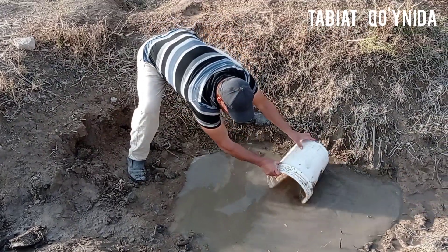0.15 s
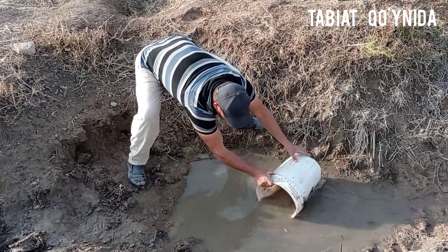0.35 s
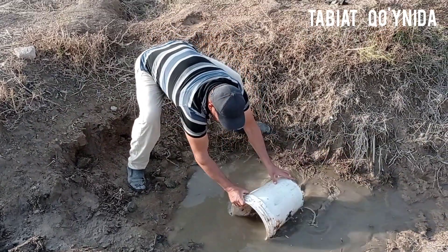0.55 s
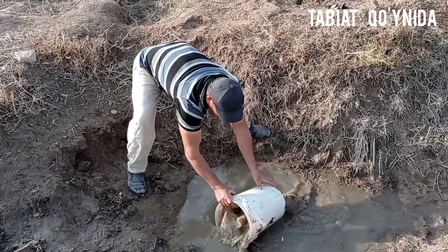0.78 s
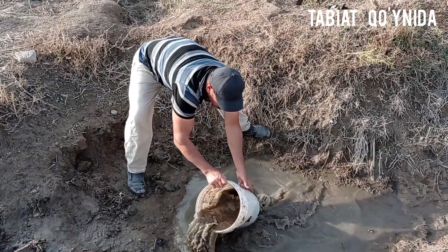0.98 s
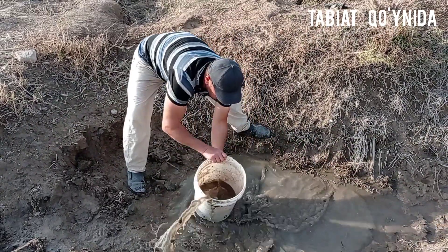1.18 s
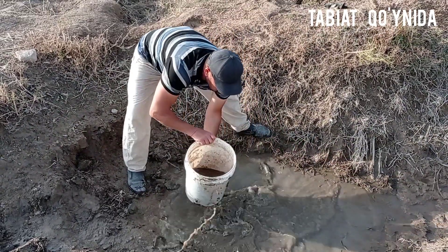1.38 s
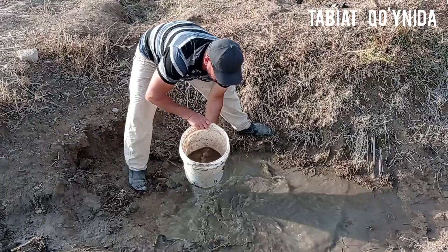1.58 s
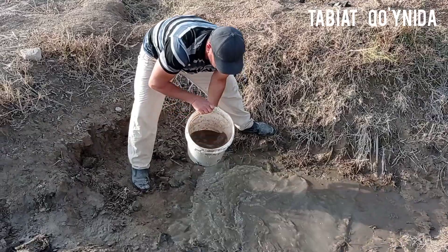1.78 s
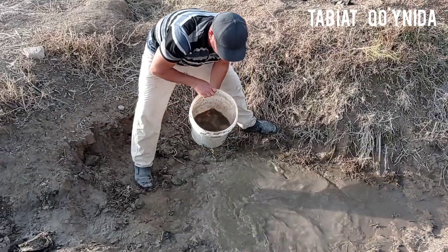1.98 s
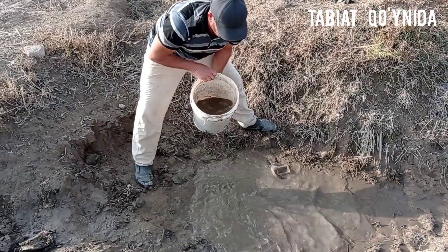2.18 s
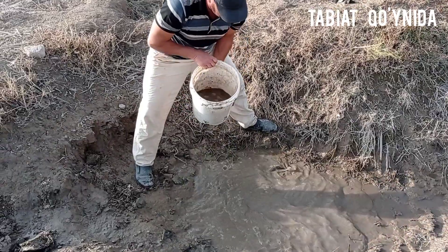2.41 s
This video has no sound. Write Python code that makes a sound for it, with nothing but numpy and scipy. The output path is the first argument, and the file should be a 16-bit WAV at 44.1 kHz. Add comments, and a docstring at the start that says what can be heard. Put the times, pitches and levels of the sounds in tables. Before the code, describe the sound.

Water sloshes and splashes as a plastic bucket scoops through a shallow puddle, with bubbly gulps and bright spatter, then thins to trickles and drops; close outdoor microphone with light wind thuds and faint hiss.

```python
"""Outdoors: light wind thuds on the microphone over a faint hiss and one thin steady tone.
A plastic bucket is dragged through a shallow muddy puddle, tipped up and lifted out.
Stirring drives swarms of damped-sine bubbles and spray; big air pockets gulp as rising sines.
Single bubbles ring amid droplets, and noise bursts snap in the treble.
The water calms to sparse trickles and the last drops fall back."""
import sys
import numpy as np
from scipy import signal
from scipy.fft import rfft, irfft, next_fast_len
from scipy.io import wavfile
from scipy.ndimage import uniform_filter1d, map_coordinates

SR = 44100
rng = np.random.default_rng(int(sys.argv[2]) if len(sys.argv) > 2 else 0)


def generate_wav(signal):
    """Clip the signal to [-1, 1] and save it as 16-bit WAV at the path in sys.argv[1]."""
    frames = np.transpose(np.atleast_2d(signal))
    scaled = np.clip(frames, -1, 1) * 32767
    pcm = np.round(scaled).astype(np.int16)
    wavfile.write(sys.argv[1], SR, pcm)


N = 108045  # samples
TOP_HZ = 15720  # band limit


def amp(db):
    """Decibels to gain."""
    return 10 ** (np.asarray(db) / 20)


def unit(x):
    """Scaled to rms 1."""
    return x / np.sqrt(np.mean(x ** 2) + 1e-20)


def along(points, hz):
    """Level in dB at hz from (Hz, dB) points on a log axis; -120 dB outside."""
    point_hz, point_db = np.transpose(points)
    return np.interp(np.log(hz + 1), np.log(point_hz + 1), point_db, -120, -120)


def curves(rows):
    """One value per sample for each column after the time."""
    time_s, *columns = np.transpose(rows)
    return [np.interp(np.arange(N) / SR, time_s, column) for column in columns]


def wobble(rate_hz):
    """Smooth random curve through rate_hz knots a second."""
    knots = rng.standard_normal(1000)
    return map_coordinates(knots, [np.arange(N) * rate_hz / SR])


def filtered(x, response):
    """x times a response of frequency, zero-padded against wrap-around."""
    size = next_fast_len(N + 8192)
    gain = response(np.fft.rfftfreq(size, 1 / SR))
    return irfft(rfft(x, size) * gain, size)[:N]


def noise(spectrum):
    """Gaussian noise coloured by a spectrum, rms 1."""
    white = rng.standard_normal(N)
    return unit(filtered(white, lambda hz: amp(along(spectrum, hz))))


def bubbles(start_s, gain, hz, cycles, rise, size):
    """Ringing air bubbles: sines losing 40 dB per life of cycles, soft onset, rising pitch, size samples."""
    step = np.arange(size)
    turns = step / SR * np.minimum(hz, TOP_HZ)[:, None]
    life = turns / np.clip(cycles, .5, 150)[:, None]
    envelope = gain[:, None] * amp(-40 * life) * (1 - np.exp(-turns / 1.812))
    wave = envelope * np.sin(2 * np.pi * turns * (1 + rise * np.minimum(life, 1) / 2))
    wave = wave * np.minimum(1, 4 - 4 * step / size)  # fade over the last quarter
    at = np.round(start_s * SR).astype(int)[:, None] + step
    return np.bincount(at.ravel(), wave.ravel(), N + size + SR)[:N]


def swarm(spectrum, count, size, base_cycles, spread_db, noise_db, lumps_db, lump_rate_hz):
    """Random bubbles, coloured by spectrum, over a noise bed; level swings in random lumps; rms 1."""
    when, pitch, loudness, damping = rng.random((count, 4)).T
    low_hz, high_hz = spectrum[0][0], spectrum[-1][0]
    hz = low_hz * (high_hz / low_hz) ** pitch
    gain = hz * amp(along(spectrum, hz) + spread_db * loudness ** 3)
    cycles = base_cycles * (0.19 + 1.55 * damping)
    grains = bubbles(when * N / SR, gain, hz, cycles, rise=0.025, size=size)
    bed = amp(noise_db) * noise(spectrum)
    lumps = amp(lumps_db * np.tanh(wobble(lump_rate_hz)))
    return unit((unit(grains) + bed) * lumps)


# wind level: (time [s], level [dB])
WIND = [(0, -76.5), (.04, -65), (.08, -85), (.13, -58.5), (.17, -70), (.23, -53), (.31, -64), (.36, -61),
        (.47, -65.5), (.53, -76.5), (.61, -67), (.81, -71), (.91, -66), (.99, -69.5), (1.07, -59),
        (1.25, -69.5), (1.39, -56.5), (1.5, -79), (1.63, -65), (1.81, -80), (1.86, -56.5), (1.97, -80),
        (2.025, -66.5), (2.08, -75), (2.13, -55.5), (2.2, -83), (2.3, -75), (2.335, -57), (2.355, -52),
        (2.39, -56.5), (2.45, -65.5)]
# wind colour: (frequency [Hz], relative density [dB per Hz])
RUMBLE = [(25, -32), (44, -0.5), (81, 9), (141, 0.5), (177, -11.5), (230, -9.5), (300, -61.5)]


def wind():
    """Wind thuds: low noise on a smoothed level curve with a small random wobble."""
    level_db, = curves(WIND)
    level_db = uniform_filter1d(level_db, size=500) + 1.0 * wobble(25.725)
    return amp(level_db) * noise(RUMBLE)


# hiss colour: (frequency [Hz], relative density [dB per Hz])
HISS = [(150, -14), (450, -22), (700, -17.5), (7400, -25.5), (15500, -35.5)]
HISS_DB = -87  # rms


def hiss():
    """Steady coloured noise."""
    return amp(HISS_DB) * noise(HISS)


# steady sine: (frequency [Hz], level before a 3.5 dB lift [dB])
TONE = [(7822, -94.5)]


def tone():
    """Constant sine, peak 3.5 dB above the table level."""
    t = np.arange(N) / SR
    return sum(amp(db + 3.5) * np.sin(2 * np.pi * hz * t) for hz, db in TONE)


# stirred water: (time [s], level [dB], spray re level [dB], gurgle re level [dB])
STIR = [(0, -63, -10.5, -24.5), (.045, -74, -7, -13), (.065, -78.5, -23.5, -23.5), (.108, -82, -2.5, -11),
        (.116, -73, -11.5, -7.5), (.19, -78, -16, -13), (.23, -58, -23, -20), (.275, -58, -25.5, 4.5),
        (.305, -66, -5.5, -21.5), (.314, -56.5, -3.5, -3.5), (.39, -50.5, -6.5, -14),
        (.43, -54, -13.5, -10.5), (.48, -59.5, -11, -24), (.54, -51.5, -4, -17), (.57, -49, -1.5, -5),
        (.65, -46.5, -9.5, -13), (.72, -50.5, -0.5, -1), (.77, -49.5, -10.5, -13.5),
        (.84, -50, -2.5, -12.5), (.89, -44, -11, -4.5), (.95, -48.5, -1.5, -6), (1.06, -48.5, -4.5, -8.5),
        (1.12, -44, -4, -15), (1.25, -51.5, 2.5, -3), (1.4, -50.5, -1, -6), (1.53, -58.5, 6, -9.5),
        (1.58, -58, -4.5, -46), (1.65, -64.5, 4.5, -16.5), (1.7, -55.5, -12, -23.5), (1.735, -60, 4, -17.5),
        (1.78, -63.5, -5.5, -13.5), (1.87, -67, -0.5, -19.5), (2.04, -77, -2, -8),
        (2.065, -72.5, 3.5, -8.5), (2.16, -77.5, -3, -11), (2.22, -85.5, 7, -0.5), (2.45, -93.5, -0.5, 5)]
# mid-size bubbles: (frequency [Hz], relative density [dB per Hz])
BODY = [(350, -21), (600, -7), (729, -10), (1070, -1.5), (1350, -1), (1790, 1), (3600, -8.5), (4680, -30)]
# smallest bubbles: (frequency [Hz], relative density [dB per Hz])
SPRAY = [(1760, -4.5), (3000, -1), (4500, -3.5), (5060, -6.5), (6310, -9.5), (8080, -19.5), (9670, -19),
         (13400, -31), (15500, -27)]
# largest bubbles: (frequency [Hz], relative density [dB per Hz])
GURGLE = [(100, -72), (170, -4.5), (220, 1.5), (285, 1.5), (476, 3.5), (800, -14), (1040, -16)]
CALM_DB, CALM_SPAN_DB = -57, 15.5  # calm sets in below the first, is full one span lower


def slosh():
    """Three bubble sizes follow the stirring; calm thins the rush to sparse, long-ringing bubbles."""
    level_db, spray_db, gurgle_db = curves(STIR)
    calm = np.clip((CALM_DB - level_db) / CALM_SPAN_DB, 0, 1)
    body = swarm(BODY, count=3600, size=1100, base_cycles=29.95, spread_db=15.5,
                 noise_db=-3, lumps_db=1, lump_rate_hz=50)
    trickle = swarm(BODY[2:], count=750, size=3000, base_cycles=70, spread_db=9,
                    noise_db=-9, lumps_db=3, lump_rate_hz=20)
    spray = swarm(SPRAY, count=8000, size=500, base_cycles=25, spread_db=16,
                  noise_db=-2, lumps_db=3.5, lump_rate_hz=70)
    beads = swarm(SPRAY, count=1300, size=1500, base_cycles=85, spread_db=9,
                  noise_db=-5, lumps_db=3.5, lump_rate_hz=15)
    gurgle = swarm(GURGLE, count=900, size=3500, base_cycles=8.62, spread_db=4,
                   noise_db=1.0, lumps_db=4.5, lump_rate_hz=33)
    dense_gain = amp(-11 * calm)
    sparse_gain = .3 + .7 * calm
    middle = dense_gain * body + sparse_gain * trickle
    treble = amp(spray_db) * (dense_gain * spray + sparse_gain * beads)
    return amp(level_db) * (middle + treble + amp(gurgle_db) * gurgle)


# big air pockets: (time [s], peak [dB], starting pitch [Hz], length [s], pitch rise [share])
GULPS = [(.008, -61.5, 518, 0.0304, 0.021), (.226, -48, 139, 0.0855, 0.42),
         (.262, -59, 499.2, 0.0395, 0.0183), (0.38, -45.5, 419.6, 0.0156, 0.054),
         (0.557, -44.5, 216.5, 0.0328, 0.021), (0.614, -41, 242, 0.0313, 0.038),
         (0.625, -46.5, 563.3, 0.0247, 0.055), (.59, -53.5, 140.5, 0.1784, 0.64),
         (0.843, -42, 587.3, 0.0091, 0.077), (.893, -37, 202, 0.0474, 0.46),
         (1.151, -45.5, 465, 0.032, 0.237), (1.228, -47.5, 255.7, 0.0336, 0.031),
         (1.295, -45.5, 499.7, 0.0484, 0.583), (1.331, -39, 272, 0.0188, 0.016),
         (1.428, -52.5, 335.2, 0.1044, 0.0473), (1.475, -49.5, 335.3, 0.0632, 0.376)]


def gulps():
    """An air pocket swells, sings upward and closes: a rising sine under a skewed arch."""
    out = np.zeros(N + SR)
    for start_s, db, hz, length_s, rise in GULPS:
        u = np.arange(round(length_s * SR)) / (length_s * SR)
        arch = np.sin(np.pi * u ** 0.484) ** 1.367
        turns = hz * length_s * (u + rise * u ** 3 / 3)
        out[round(start_s * SR):][:len(u)] += amp(db) * arch * np.sin(2 * np.pi * turns)
    return out[:N]


# single bubbles and drops: (time [s], level before onset and decay [dB], pitch [Hz], life to -40 dB [cycles])
PLINKS = [(0.3127, -31, 2770, 12.4), (0.331, -38, 1351, 17.7), (0.377, -36.5, 1180, 25),
          (0.395, -30.5, 1990, 16.2), (0.5213, -40, 943.7, 21), (0.5608, -35, 1472, 19.6),
          (0.5635, -32, 2798, 30.4), (0.5884, -22.5, 2610, 9.8), (0.6426, -25, 1770, 14.2),
          (0.6495, -25, 1977, 17.5), (0.686, -30, 3058, 23.2), (0.7758, -24, 3837, 7.9),
          (0.794, -32.5, 3510, 15.7), (0.8701, -33, 2103, 40), (0.8926, -17.5, 1706, 11.94),
          (0.9496, -20.5, 1715, 8.3), (1.0246, -23.5, 3500, 10.95), (1.039, -27.5, 1800, 11.7),
          (1.0905, -27.5, 882, 9.16), (1.1086, -31, 4514, 38), (1.1075, -23, 1126, 17.9),
          (1.1408, -21.5, 1264, 11.4), (1.1955, -32, 5994, 29.7), (1.242, -28.5, 1896, 13.7),
          (1.2593, -25, 3282, 12.2), (1.2895, -26, 2057, 14.3), (1.3108, -34.5, 3533, 29.6),
          (1.4196, -25, 4415, 21.9), (1.4194, -25.5, 2347, 15.4), (1.511, -31.5, 3706, 18.4),
          (1.5291, -36.5, 3144, 25), (1.5572, -38.5, 3154, 46), (1.557, -44, 1206, 18.4),
          (1.6034, -25.5, 2553, 5.24), (1.6664, -38, 3130, 14.5), (1.6862, -38, 1845, 44.5),
          (1.72, -34, 2116, 12.4), (1.8235, -36.5, 4360, 9.4), (1.8573, -44, 5095, 42.6),
          (1.8559, -49, 1339, 30), (1.9507, -45.5, 3970, 24), (1.9605, -36, 4170, 29.4),
          (1.9598, -35, 5360, 20.9), (2.069, -60.5, 5050, 37), (2.129, -66.5, 2214, 71),
          (2.145, -63, 4340, 81), (2.157, -47, 3350, 21.3), (2.1602, -48.5, 6960, 23),
          (2.166, -51, 2676, 19.8), (2.1846, -65, 3520, 58), (2.2473, -54.5, 4230, 84.5),
          (2.296, -55.5, 2627, 25.2), (2.301, -50.5, 2707, 40.3)]
SPATTER_S, SPATTER_DB = 0.01, -10.5  # latest droplet delay, strongest droplet re its plink
SPATTER_OCTAVES = 0.2628  # droplet pitch: this far below to twice this above


def plinks():
    """Each loud bubble rings briefly amid eight weaker droplets of nearby pitch."""
    start_s, db, hz, cycles = np.transpose(PLINKS)[..., None]
    when, up, size = np.moveaxis(rng.random((len(start_s), 8, 3)), 2, 0)
    drop_s = start_s + SPATTER_S * when ** 1.5
    drop_gain = amp(db + SPATTER_DB - 7.8 * size)
    drop_hz = hz * 2 ** (SPATTER_OCTAVES * (3 * up ** 2 - 1))
    drop_cycles = 14 + 12 * size
    spatter = bubbles(drop_s.ravel(), drop_gain.ravel(), drop_hz.ravel(), drop_cycles.ravel(),
                      rise=0.12, size=900)
    rings = bubbles(start_s[:, 0], amp(db)[:, 0], hz[:, 0], cycles[:, 0], rise=0.015, size=1500)
    return rings + spatter


# sharp bright snaps of spray: (time [s], level before a 6.5 dB cut [dB])
SNAPS = [(0.6497, -53), (0.7756, -38.5), (0.8924, -48), (1.4185, -37.5), (1.4835, -45), (1.519, -44),
         (1.604, -47), (1.719, -49.5), (1.961, -53.5)]
SNAP_T60_S, SNAP_HZ = 0.0251, 5900  # 60 dB decay time, lower edge


def snaps():
    """Treble noise bursts with a soft start and exponential decay."""
    start_s, db = np.transpose(SNAPS)
    strikes = np.zeros(N)
    strikes[np.round(start_s * SR).astype(int)] = amp(db - 6.5)
    t = np.arange(SR // 20) / SR
    decay = amp(-60 * t / SNAP_T60_S) * (1 - np.exp(-t / 0.0015))
    white = rng.standard_normal(N)
    treble = unit(filtered(white, lambda hz: hz ** 2 / (hz ** 3 + SNAP_HZ ** 3)))
    return treble * signal.fftconvolve(strikes, decay)[:N]


def scene():
    """All sources, one channel."""
    return (wind() + hiss() + tone() + slosh() + gulps() + plinks() + snaps())[None]


def record(dry):
    """Nothing is kept above the band limit."""
    return filtered(dry[0], lambda hz: hz < TOP_HZ)[None]


dry = scene()
out = record(dry)
generate_wav(out)
```